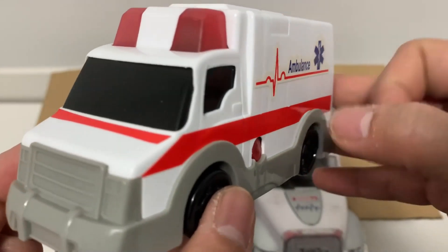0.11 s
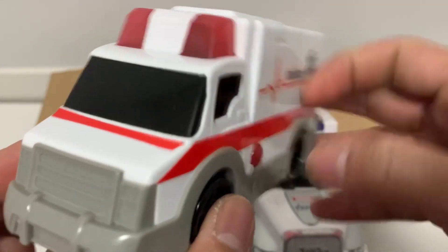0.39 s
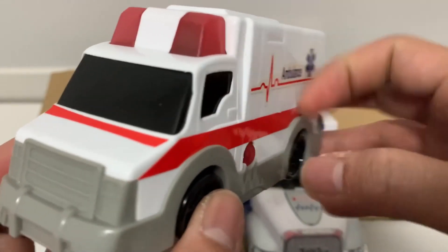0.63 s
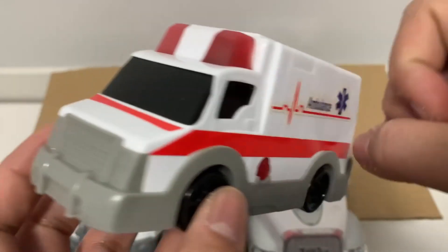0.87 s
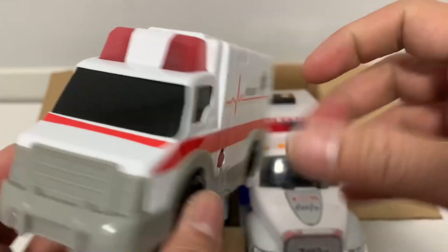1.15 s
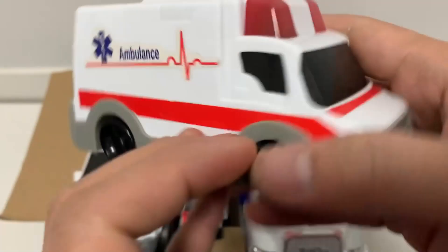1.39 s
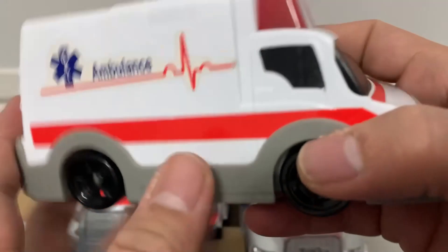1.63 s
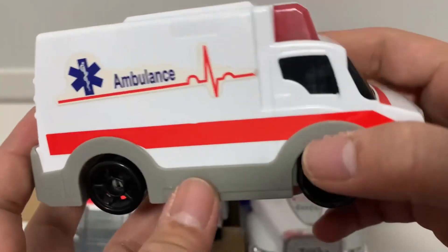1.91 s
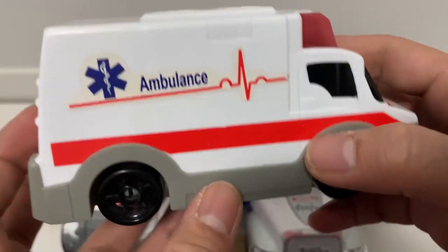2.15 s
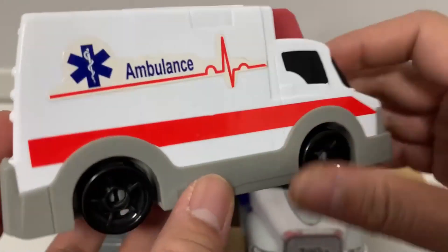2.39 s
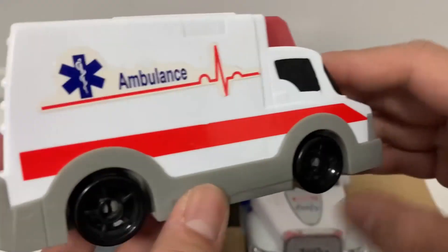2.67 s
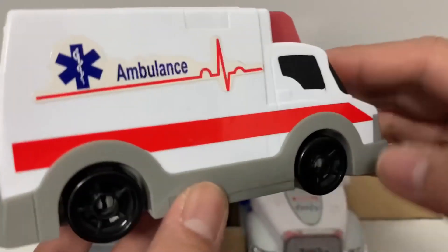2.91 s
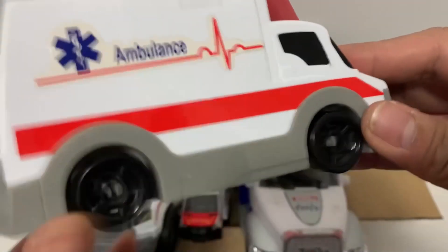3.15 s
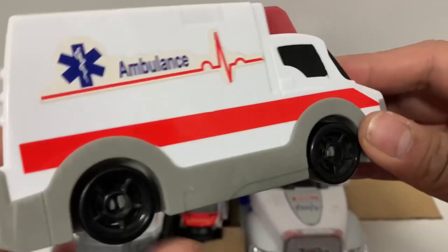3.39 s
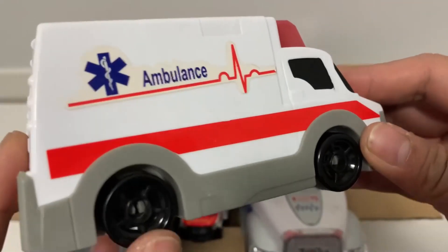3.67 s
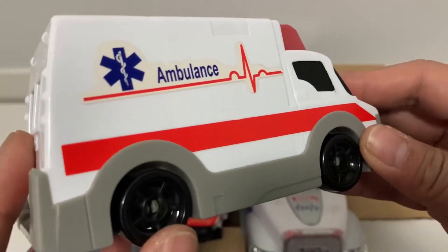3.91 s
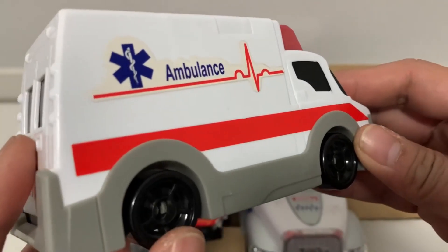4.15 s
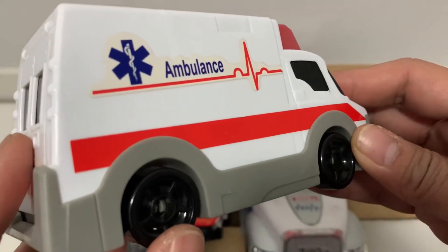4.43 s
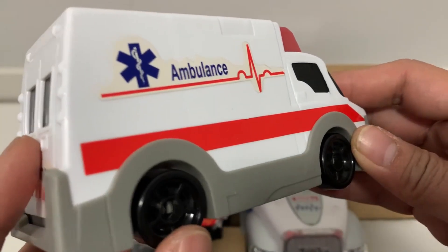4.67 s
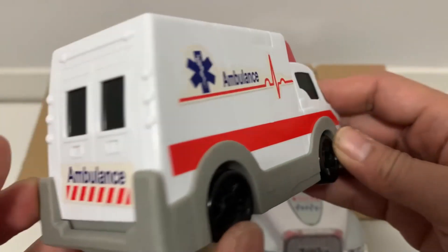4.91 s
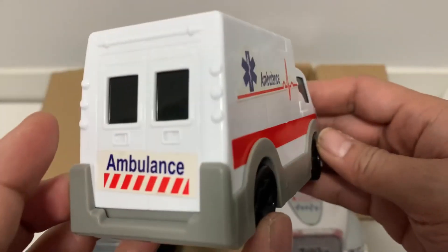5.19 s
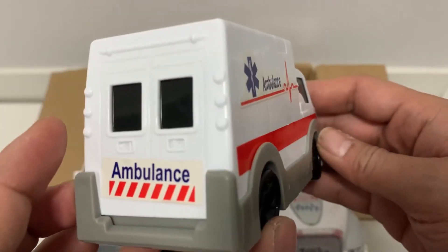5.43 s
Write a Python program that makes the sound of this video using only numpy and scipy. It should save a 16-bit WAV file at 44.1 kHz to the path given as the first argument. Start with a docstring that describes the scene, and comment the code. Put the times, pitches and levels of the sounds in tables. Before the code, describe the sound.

Close, dry clacks and clicks of a light plastic toy being handled, busy for under four seconds, fading to a few faint ticks.

```python
"""In a small room, a hollow plastic toy van is turned in the hands close to a phone: its door snaps, the shell
is knocked, loose wheels and axles rattle and fingers slide. Knocks are short decaying tones of the panels and
the hollow cabin, clicks are smeared snaps of hard edges, rubs are filtered noise, rattling is a crowd of taps
and bumps are low thuds. The room answers with fading noise over a low rumble; the phone suppresses faint
hiss and the loudest blows overload it."""
import sys
import numpy as np
from scipy import signal
from scipy.fft import rfft, irfft
from scipy.io import wavfile
from scipy.ndimage import uniform_filter1d

SR = 44100
rng = np.random.default_rng(int(sys.argv[2]) if len(sys.argv) > 2 else 0)


def dump(signal):
    """Clip the signal to [-1, 1] and save it as 16-bit WAV at the path in sys.argv[1]."""
    limited = np.clip(np.atleast_2d(signal).T, -1, 1)
    pcm = np.round(limited * 32767).astype(np.int16)
    wavfile.write(sys.argv[1], SR, pcm)


def magnitude_from_level(level_db):
    """Linear magnitude for a level in decibels (20 dB per decade)."""
    exponent = np.asarray(level_db, float) / 20
    return 10 ** exponent


N = 245195
HZ = np.fft.rfftfreq(N, 1 / SR)
T = np.arange(N) / SR
SIDES = np.array([[1], [-1]])  # left port, right port

# Source levels are those before the two ports' tilt and the phone's gain.
# knocks on the shell: (time of the peak [s], cabin level [dB], cabin pitch at the peak [Hz],
# contact [ms], panels against cabin [dB])
KNOCKS = [(0.1215, -38.5, 664.5, 5.3, -15.5), (0.2071, -16.5, 568, 2.4, -2), (0.2186, 2, 575, 1.88, -0.5),
          (0.2292, -20, 579.4, 4.6, -5), (0.2637, -27.5, 595, 8.6, -6), (0.4147, 0, 620.6, 2.03, -3),
          (0.4407, -31.5, 589.4, 3.7, -4), (0.4599, -32, 609, 6.7, -10), (0.5993, -0.5, 605, 2.27, -4),
          (0.6099, -16, 607.4, 1.76, -11.5), (0.6416, -28, 585, 8.6, -11), (0.7877, -31.5, 714, 6.3, 2),
          (0.8056, -29.5, 820, 1.5, -4.5), (0.9186, -21.5, 641.5, 1.46, -0.5),
          (0.9697, 7, 639.7, 1.63, -9.5), (0.9766, -12, 660.5, 1, -6.5), (0.999, -6.5, 625, 1.8, -13.5),
          (1.0094, -28.5, 688, 1.8, -11.5), (1.0318, -4, 732.4, 1.74, -6.5),
          (1.0741, -28.5, 626, 1.5, -10.5), (1.1353, -33.5, 653, 9.6, -6.5), (1.2786, -17, 654, 2, -6),
          (1.2915, -23, 685, 3.5, -12), (1.3616, -27, 695, 4.2, 1.5), (1.404, -31.5, 722, 4.3, -0.5),
          (1.4167, -31, 733, 10, 4), (1.4307, -32, 715, 4.1, -4.5), (1.4783, -30, 710, 3.8, -1.5),
          (1.5441, -33.5, 675, 2.1, -1.5), (1.5571, -33, 650, 2, -16), (1.5842, -32.5, 570, 3.8, -10),
          (1.6039, -24, 660, 4.3, -3.5), (1.6634, -20.5, 600, 6.3, 0), (1.678, -15, 650, 4.7, -4),
          (1.6843, -13.5, 720, 2.5, -6), (1.7105, -21.5, 720, 7.5, 0), (1.7485, -33.5, 650, 5.3, 5.5),
          (1.7926, -29.5, 692, 3.5, -4), (1.8141, -29.5, 684, 1.9, -10), (2.1012, -38.5, 638, 2.6, 0),
          (2.196, -20.5, 645, 16.5, -7.5), (2.2033, -13, 651, 5.4, -14.5), (2.2159, -36, 660, 2, 5),
          (2.2453, -18, 757.0, 8.8, 5), (2.2578, -17, 670, 4.1, 1.5), (2.3266, -25, 691, 2, 5.5),
          (2.3995, -13, 711.6, 2.13, -2.5), (2.4907, -34, 661, 3.8, 13.5), (2.5107, -20, 745, 5, -5),
          (2.5697, -20.5, 723, 6.3, 3), (2.58, -14.5, 744, 3.1, 13.5), (2.6, -29, 692.0, 1.8, -2),
          (2.7526, -36.5, 716, 2.4, 2.5), (2.7816, -19, 770, 3.6, 12.5), (2.8254, -25.5, 728, 4.3, 2.5),
          (2.8393, -19, 732, 0.7, -5), (2.8485, -21.5, 683, 9, 5), (2.9325, -33, 686.4, 3.4, 4.5),
          (3.0412, -36.5, 709, 2.9, 11.5), (3.0654, -30.5, 696.5, 4.7, 2), (3.105, -33, 613, 2.4, -16),
          (3.1283, -19.5, 724, 3.4, -7.5), (3.1999, -7.5, 650, 5.1, 2.5), (3.2177, -20, 674, 2.4, 1),
          (3.2402, -24, 678, 3.8, -4), (3.251, -18, 798, 4.5, -8), (3.2694, -15.5, 696, 4.8, -17),
          (3.2853, -23.5, 687, 4.2, 0.5), (3.2925, -23, 680, 4.5, -1.5), (3.3474, -32.5, 835, 2.2, -6.5),
          (3.4073, -37, 816, 2.2, -9), (3.4527, -5.5, 762.5, 3.55, -3.5), (3.4913, -17, 702, 2.3, -1),
          (3.4988, -14.5, 725, 4.9, -4.5), (3.51, -21, 710, 4.4, -3.5), (3.5265, -22.5, 643, 3.5, 2),
          (3.5332, -22.5, 667, 3.8, -4.5), (3.5467, -18.5, 605, 7.2, -1),
          (3.5542, -18.5, 734.0, 4.1, -11.5), (3.5728, -21, 659.6, 18.5, -2), (3.5849, -24.5, 700, 6, -5),
          (3.5983, -23, 710, 6.9, -8), (3.6101, -27.5, 688, 3.5, 5.5), (3.6276, -24.5, 656, 3.3, -3.5),
          (3.6402, -22, 657, 3.6, -7.5), (3.7969, -37, 644, 4.5, -35.5), (4.1043, -50.5, 785, 3.3, -6.5),
          (4.6796, -25.5, 697, 4.2, -1.5), (4.7096, -38.5, 702, 3.4, 3), (4.7201, -32, 734, 3.4, -3.5),
          (4.7539, -36.5, 650, 3, -9), (4.805, -38.5, 626, 7.8, -7.5), (4.8194, -33.5, 766, 2.7, -3),
          (4.8384, -41.5, 720, 2.1, -13.0), (4.8884, -42, 720, 2.9, 5), (4.9435, -37.5, 670, 2.1, 0.5),
          (4.9678, -41, 678, 2.5, -6)]
# panels of the shell, before each knock varies them: (pitch [Hz], relative level [dB], time to fall 60 dB [s])
PANELS = [(979.6, 0, 0.019), (1360, 5.5, 0.0088), (1637, -2, 0.035), (1913, -6.5, 0.023),
          (2200, -13, 0.016), (2500, -5, 0.0059)]
PANEL_LEAD_S = 0.0032
KNOCK_LEFT_DB = 3  # the cabin opens towards the left port

# clicks of hard edges: (time of the peak [s], level [dB], colour centre [Hz], colour spread [octaves],
# contact [ms])
CLICKS = [(0.2168, 1.5, 5220, 1.53, 1.54), (0.413, 1, 4526, 1.8, 1.4), (0.5976, 2.5, 4635, 1.7, 1.23),
          (0.803, -33.5, 5000, 1.2, 1.5), (0.9141, -17, 6150, 1.9, 1), (0.968, 2.5, 5283, 1.36, 0.73),
          (0.9973, -6, 4580, 1.3, 1.4), (1.03, -3, 6476, 1.7, 2.6), (1.276, -16.5, 4220, 1.5, 2.1),
          (1.3641, -9, 6964, 0.64, 1.6), (1.6005, -28, 2800, 0.28, 0.71), (1.6638, -13.5, 4727, 0.69, 0.99),
          (1.6739, -11.5, 4832, 0.87, 1.2), (1.7525, -20, 2770, 0.58, 2.7),
          (2.0998, -31.5, 4280, 0.39, 1.0), (2.1154, -30, 4443, 0.91, 4.5), (2.2424, -16, 4764, 0.64, 1.1),
          (2.2535, -10, 2716, 1.1, 1.3), (2.3056, -25.5, 4180, 1.2, 1.6), (2.3975, -1, 4000, 0.73, 1.05),
          (2.484, -11.5, 4930, 0.45, 1), (2.5094, -22.5, 3580, 0.58, 1.7), (2.5661, -11.5, 6215, 1.06, 1.8),
          (2.5773, -7, 4960, 0.47, 3.6), (2.5908, -18.5, 4950, 0.51, 2.3), (2.7796, -4.5, 5310, 0.58, 1.3),
          (2.8331, -21, 3860, 1.8, 4.6), (2.8526, -21, 4760, 0.34, 1.1), (3.0608, -31, 4745, 0.69, 1.6),
          (3.1254, -32.5, 3115, 0.78, 2.9), (3.1588, -22, 6960, 0.13, 3), (3.1944, -6, 4837, 0.89, 4.2),
          (3.2109, -19, 2855, 0.66, 0.75), (3.2504, -19, 5000, 0.38, 0.5), (3.2776, -15.5, 2830, 0.27, 1.4),
          (3.3449, -31, 3007, 0.69, 1.0), (3.4529, 0, 4900, 1.1, 1.3), (3.4887, -11, 4520, 0.49, 3.6),
          (3.4964, -5, 5400, 0.55, 4.7), (3.5057, -15, 5800, 0.55, 1.2), (3.5334, -13, 5180, 0.63, 2.3),
          (3.564, -15, 5060, 0.26, 1.5), (3.546, -21, 4100, 0.71, 1.9), (3.6, -23.5, 4000, 0.7, 1.5),
          (3.5731, -17, 4880, 0.64, 4.3), (3.6685, -33, 6800, 0.24, 2.7), (4.6758, -32, 2945, 0.56, 1.8)]
# panels and stiff small parts that colour clicks and rubs: (pitch [Hz], width [Hz], level [dB])
PARTS = [(1020, 1300, 17.5), (1570, 1100, 13), (2200, 980, 1), (3200, 900, -7), (4000, 900, -26),
         (5400, 640, 12), (7225, 1000, 5.5), (9700, 3500, -2.5), (14500, 4400, 1.5)]
CLICK_LEFT_DB = -0.5
BURST_RISE_S, BURST_FADE_S = 0.0022, 0.0031
ALIKE_NEAR = 0.93  # likeness of the noise in clicks and rubs at the two ports, 0 to 1

# rubs, before the grit: (time of the peak [s], level [dB], rise [ms], fade [ms], colour centre [Hz])
RUBS = [(0.204, -34.5, 10, 7.7, 3359), (0.405, -32.5, 4.9, 5.1, 2897), (0.59, -45, 13, 4.3, 3072),
        (0.802, -39.5, 19, 23, 2200), (0.928, -41, 11, 54, 2200), (1.29, -42, 16, 63, 3299),
        (1.352, -29.5, 7.2, 17, 2330), (1.373, -36, 10, 50, 4900), (1.47, -41, 25, 36, 2766),
        (1.608, -47, 8.9, 32, 1920), (1.684, -27, 26, 20, 2714), (1.758, -36, 20, 13.3, 2300),
        (1.881, -55, 23, 19, 2500), (2.122, -41.5, 22, 39, 3200), (2.198, -40.5, 44, 25, 1790),
        (2.27, -38, 9.5, 30, 2660), (2.318, -36, 16, 27, 2200), (2.383, -34.5, 14, 15, 2000),
        (2.42, -40, 13, 33, 5920), (2.493, -29.5, 13, 16, 2290), (2.556, -36.5, 13, 11, 5740),
        (2.6, -33.5, 15, 20, 3314), (2.649, -45.5, 23, 22, 6190), (2.795, -33, 8, 39, 2410),
        (2.854, -31.5, 22, 17, 3186), (2.94, -47, 13, 24, 2580), (3.07, -47, 17, 35, 3280),
        (3.16, -40, 28.4, 21, 5760), (3.186, -22.5, 12, 3.7, 6640), (3.215, -37, 14, 27, 3003),
        (3.26, -33.5, 26, 26, 2830), (3.469, -34.5, 9.73, 13, 3630), (3.513, -34, 19, 22, 4210),
        (3.548, -28, 26, 35, 3600), (3.6, -37.5, 18, 20, 4156), (3.65, -50.5, 27, 17, 6230),
        (3.668, -51, 8, 8.5, 5600), (4.12, -68.5, 14, 25, 4600), (4.688, -53.5, 8, 19, 2060),
        (4.821, -52.5, 27, 49, 2270), (5.066, -52.5, 24, 23, 6320)]
RUB_OCTAVES = 1.194  # spread of a rub's colour

# shakes that set the loose axles chattering: (time of the peak [s], level [dB], rise [ms], fade [ms])
SHAKES = [(0.1, -57.5, 110, 180), (0.27, -51, 100, 54), (0.46, -44, 62, 30), (0.64, -46.5, 72, 94),
          (1.07, -40.5, 110, 30), (1.4, -36.5, 99, 123), (1.701, -30.5, 47, 48), (2.25, -40, 104, 83),
          (2.6, -39, 50, 50), (2.88, -37.5, 68, 42), (3.27, -31, 146, 17), (3.631, -31.5, 100, 28),
          (4.71, -47, 26, 60), (4.86, -46.5, 40, 96)]
RATTLE_PITCHES_HZ, RATTLE_PER_S = (734 * 0.9, 734), 220

# bumps of the hands through the shell: (time of the start [s], level of the thud [dB], pitch [Hz])
BUMPS = [(0.209, -21, 317), (0.41, -12.5, 349), (0.596, -18.5, 280), (0.963, -23.5, 156),
         (0.999, -23.5, 310), (1.029, -26, 307), (1.274, -32, 72), (1.681, -32.5, 75.5), (1.742, -36, 104),
         (2.387, -36, 78.6), (2.566, -15, 245), (2.779, -34, 87), (2.834, -26.5, 115), (2.846, -23.5, 94),
         (3.192, -24, 120), (3.259, -35.5, 74.5), (3.489, -33.5, 88), (4.804, -41.5, 93)]
BUMP_CYCLES = 0.69  # from the start to the peak of the push

# the room's answer, one row per octave band: (centre [Hz], level [dB])
ROOM = [(150, -22), (400, -18.5), (800, -11.5), (1600, -16), (3200, -12.5), (6400, -20.5), (12800, -24.5)]
# how long each of those bands lasts: (time to fall 60 dB [s])
ROOM_T60_S = [.45, 0.45, 0.44, 0.52, 0.39, 0.46, .3]

# colour of the room tone: (frequency [Hz], relative level [dB per Hz])
TONE = [(12, -63), (20, -33), (44, -3.5), (93, -2), (134, -10), (234, -19), (459, -23.5), (641, -28),
        (4060, -31.5), (7950, -39), (8640, -48), (11100, -33.5), (14700, -58), (16000, -62.5)]
# likeness of the room tone at the two ports: (frequency [Hz], likeness [-1 to 1])
ALIKE = [(60, 0.83), (130, 1), (290, 0.026), (640, 0.83), (1410, -0.018), (3100, -0.61), (6820, -0.061),
         (15000, 0.85)]
# the rumble swells and ebbs, before a random waver: (time [s], gain [dB])
RUMBLE = [(0, -45.5), (.5, -62.5), (1, -57.5), (1.5, -53), (2, -55), (2.5, -53.5), (3, -52.5), (3.4, -54),
          (3.8, -62), (4.2, -57), (4.6, -51.5), (5.1, -55), (5.56, -47.5)]
HISS_GAIN_DB = -54

# the toy's sound at the two microphone ports: (frequency [Hz], phase by which the left leads [rad])
LEAD = [(0, 0.03), (1000, 0.5), (1720, 2.12), (2400, 1.97), (3400, 4.59), (4500, 7.17), (5500, 9.49),
        (6800, 11.3), (8600, 9.2), (10500, 6.45), (11300, 5.98), (13100, 3.07), (14100, 2.64), (15300, 0.4)]
# tilt between the ports: (frequency [Hz], extra level of the left over the right [dB])
LEFT = [(300, 0), (1200, 5), (2400, 0), (4400, -1.5), (8000, -0.5), (14000, 0.5)]

GAIN_DB = 4  # of the phone
GATE_DB, MOST_CUT_DB, GATE_KNEE_DB, GATE_S = -55.5, 4, 5, 0.03


def on_log(table):
    """Read a table of (Hz, value) at every frequency, straight on a log axis."""
    hz, value = np.transpose(np.array(table, float))
    return np.interp(np.log(HZ + 1), np.log(hz + 1), value)


def shape(x, gain):
    """Filter by a gain per frequency."""
    return irfft(rfft(x) * gain, N)


def rumble_part(x):
    """Keep what lies below about 300 Hz."""
    return shape(x, 1 / (1 + (HZ / 300) ** 4))


def unit(x):
    """Scale to rms 1."""
    return x / np.sqrt(np.mean(x ** 2))


def walk(rate):
    """Wander smoothly between random levels, drawn rate times a second."""
    hold = int(SR / rate)
    levels = np.repeat(rng.standard_normal(N // hold + 1), hold)
    return 0.5 * uniform_filter1d(uniform_filter1d(levels, hold), hold)[:N]


def add(out, s, sound):
    """Mix a short sound in at s seconds."""
    i = max(int(s * SR), 0)
    out[..., i:i + sound.shape[-1]] += sound[..., :N - i]


def left_louder(db):
    """Gains that make the left port louder than the right by db."""
    return magnitude_from_level(db * SIDES / 2)


def bell(f, hz, octaves):
    """A bell-shaped gain around hz on an octave scale."""
    return np.exp(-0.5 * (np.log2(f / hz + 1e-3) / octaves) ** 2)


def swell(t, contact_s):
    """A push that takes contact_s to build, peaks at t = 0 with 1 and dies away."""
    u = np.clip(1 + t / contact_s, 0, None)
    return (u * np.exp(1 - u)) ** 3


def cabin(t, hz, contact_s, sag=0.1):
    """A few cycles of the cabin's air: the pitch is highest at the peak and sags to either side."""
    bent_t = t - sag * t * np.abs(t) / (np.abs(t) + contact_s)
    return swell(t, contact_s) * np.sin(2 * np.pi * hz * bent_t)


def knocks(spread_db=1.5):
    """Panels answer first and briefly, the cabin after them; each knock varies the panel tones."""
    out, t = np.zeros((2, N)), np.arange(-0.015 * SR, 0.04 * SR) / SR
    f, mode_db, t60 = np.transpose(PANELS)[:, :, None]
    chance = rng.standard_normal((len(KNOCKS), 3, len(PANELS), 1))
    early = np.clip(t + PANEL_LEAD_S, 0, None)  # time since the panels were struck
    onset = 1 - np.exp(-early / 0.00023)
    for (s, db, hz, ms, panel_db), (level, detune, phase) in zip(KNOCKS, chance):
        decay = magnitude_from_level(mode_db + spread_db * level) * np.exp(-np.log(1000) * early / t60)
        rings = decay * np.sin(2 * np.pi * f * (1 + 0.063 * detune) * t + phase)
        panels = rings.sum(0) * onset
        sound = cabin(t, hz, ms / 1000) + magnitude_from_level(panel_db) * panels / np.abs(panels).max()
        add(out, s + t[0], magnitude_from_level(db) * left_louder(KNOCK_LEFT_DB) * sound)
    return out


def resonances(table, f):
    """Gain of side-by-side resonances (Hz, width, dB) at frequencies f."""
    return np.sqrt(sum(magnitude_from_level(2 * db) / (1 + (2 * (f - hz) / width) ** 2) for hz, width, db in table))


def colour(size, hz, octaves):
    """The toy's resonances as one contact brings them out: a bell of octaves around hz."""
    f = np.fft.rfftfreq(size, 1 / SR)
    return resonances(PARTS, f) * bell(f, hz, octaves)


def spot(size, spread_rad=2.09, hz=3200, octaves=1.0):
    """Each spot lies otherwise to the two ports: the phase between them shifts in the middle range."""
    f = np.fft.rfftfreq(size, 1 / SR)
    knots = np.arange(0, SR / 2, 1000)
    shift = np.interp(f, knots, rng.standard_normal(len(knots)))
    phase = spread_rad * shift * bell(f, hz, octaves)
    return np.exp(0.5j * phase * SIDES)


def pair(size, alike):
    """Noise at the two ports, partly the same."""
    a, b = rng.standard_normal((2, size))
    return np.array([a, alike * a + np.sqrt(1 - alike ** 2) * b])


def clicks():
    """A snap smeared over its pitches, with a short burst of noise swelling before it and fading after."""
    out, t = np.zeros((2, N)), np.arange(-1024, 1024) / SR
    steps = np.arange(1025)  # one per frequency
    knots = steps[::10]
    burst_shape = np.exp(-np.abs(t) / np.where(t < 0, BURST_RISE_S, BURST_FADE_S))
    for s, db, hz, octaves, ms in CLICKS:
        gain = colour(len(t), hz, octaves) * spot(len(t))
        # each pitch leaves the plastic at its own moment
        smear = np.interp(steps, knots, rng.standard_normal(len(knots)))
        late_s = 0.5 * ms / 1000 * smear - t[0]
        # adding up the delays over frequency gives the phase
        snap = irfft(gain * np.exp(-2j * np.pi * np.cumsum(late_s) * SR / len(t)))
        burst = unit(irfft(rfft(pair(len(t), ALIKE_NEAR)) * gain)) * burst_shape
        burst_db = -13.5 + 0.15 * db  # louder snaps carry relatively more of this noise
        sound = snap / np.abs(snap).max() + magnitude_from_level(burst_db) * burst
        add(out, s + t[0], magnitude_from_level(db) * left_louder(CLICK_LEFT_DB) * sound)
    return out


def drag(t, rise_ms, fade_ms):
    """A movement that swells to 1 at t = 0 and fades."""
    rise = np.exp(-(1000 * t / rise_ms) ** 2)
    return np.where(t < 0, rise, np.exp(-1000 * np.abs(t) / fade_ms))


def rubs():
    """Fingers and tyres drag over the plastic: gritty hiss that swells and fades."""
    out, t = np.zeros((2, N)), np.arange(-4096, 12288) / SR
    for s, db, rise_ms, fade_ms, hz in RUBS:
        gain = colour(len(t), hz, RUB_OCTAVES) * spot(len(t))
        hiss = unit(irfft(rfft(pair(len(t), ALIKE_NEAR)) * gain))
        add(out, s + t[0], magnitude_from_level(db) * hiss * drag(t, rise_ms, fade_ms))
    grit_db = 5 * walk(150) + 7 * walk(900)
    return out * magnitude_from_level(grit_db)


def rattle():
    """Loose axles chatter in dense taps of uneven size that ring the cabin while the toy is shaken."""
    taps = (rng.random(N) < RATTLE_PER_S / SR) * magnitude_from_level(4 * rng.standard_normal(N))
    t = np.arange(-0.004 * SR, 0.018 * SR) / SR
    which = rng.random(N) < 0.5  # each tap rings one of the two pitches
    rings = np.zeros(N)
    for k, hz in enumerate(RATTLE_PITCHES_HZ):
        rings += np.convolve(taps * (which == k), cabin(t, hz, 0.0028))[:N]
    shaken = sum(magnitude_from_level(db) * drag(T - s, rise_ms, fade_ms) for s, db, rise_ms, fade_ms in SHAKES)
    return left_louder(KNOCK_LEFT_DB) * shaken * unit(rings)


def bumps(shudder_hz=260, shudder_db=-6):
    """Soft pushes of the fingers: a cycle or two of low thud with a rough, dull shudder of the shell."""
    out, t = np.zeros(N), np.arange(int(0.12 * SR)) / SR
    shell = bell(np.fft.rfftfreq(len(t), 1 / SR), shudder_hz, 0.3)
    for s, db, hz in BUMPS:
        shudder = unit(irfft(rfft(rng.standard_normal(len(t))) * shell, len(t)))
        peak_s = BUMP_CYCLES / hz
        thud = np.sin(2 * np.pi * hz * t)
        add(out, s, magnitude_from_level(db) * swell(t - peak_s, peak_s) * (thud + magnitude_from_level(shudder_db) * shudder))
    return out


def room(dry):
    """Octave bands of decaying noise that begin 8 ms late, other walls to each port."""
    centres, answer = np.array(ROOM)[:, 0], 0
    for k, ((hz, db), t60) in enumerate(zip(ROOM, ROOM_T60_S)):
        band = np.interp(np.log(HZ + 1), np.log(centres), np.arange(len(centres)) == k)
        fade = np.exp(-np.log(1000) * T / t60) * (T > 0.008)
        fade = fade / np.sqrt(t60 * SR / np.log(1e6))  # long and short fades carry like energy
        answer = answer + magnitude_from_level(db) * shape(rng.standard_normal((2, N)), band) * fade
    return shape(dry, rfft(answer))


def tone():
    """Steady hiss and a wavering rumble: noise whose likeness at the two ports varies with pitch."""
    mid, side = rng.standard_normal((2, N))
    alike, gain = np.clip(on_log(ALIKE), -1, 1), magnitude_from_level(on_log(TONE))
    mid = shape(mid, gain * np.sqrt(1 + alike))
    side = shape(side, gain * np.sqrt(1 - alike))
    both = np.array([mid + side, mid - side]) / np.sqrt(np.mean(mid ** 2))
    low = rumble_part(both)
    rumble_db = np.interp(T, *np.transpose(RUMBLE)) + 2.0 * walk(3)
    return magnitude_from_level(HISS_GAIN_DB) * (both - low) + low * magnitude_from_level(rumble_db)


def suppress(x):
    """The phone's noise suppressor turns everything above the rumble down when its level is low."""
    high = x - rumble_part(x)
    power = uniform_filter1d(np.mean(high ** 2, axis=0), int(GATE_S * SR))
    level_db = 10 * np.log10(power + 1e-12)
    cut_db = MOST_CUT_DB / (1 + 0.5 * np.exp((level_db - GATE_DB) / GATE_KNEE_DB))
    return x + high * (magnitude_from_level(-cut_db) - 1)


def scene():
    """The toy reaches the two ports with a phase lead and a tilt; the room and its tone surround it."""
    toy = knocks() + clicks() + rubs() + rattle() + bumps()
    ports = np.exp(0.5j * on_log(LEAD) * SIDES) * magnitude_from_level(on_log(LEFT) * SIDES / 2)
    return shape(toy, ports) + room(toy) + tone()


def low_pass(x):
    """Removes everything above the highest recorded frequency."""
    return signal.sosfilt(signal.butter(12, 16140, fs=SR, output="sos"), x)


def record(dry):
    """The phone raises the level, suppresses hiss and clips the loudest blows flat."""
    quieted = suppress(dry * magnitude_from_level(GAIN_DB))
    mix = np.clip(quieted, -1, 1)
    return low_pass(mix)


dry = scene()
out = record(dry)
dump(out)
```